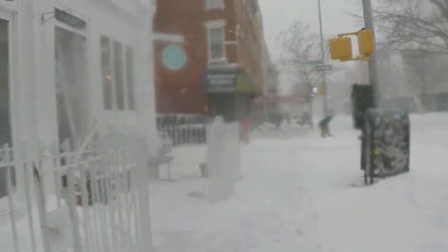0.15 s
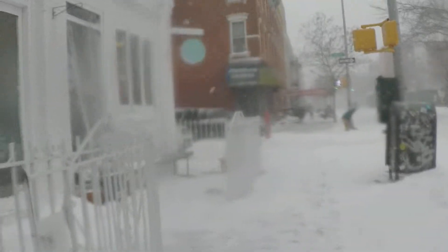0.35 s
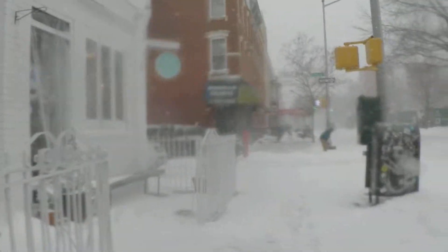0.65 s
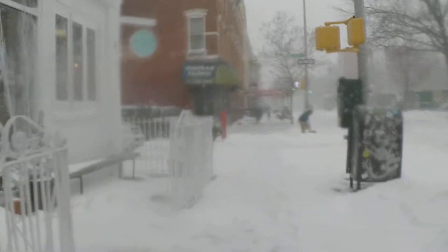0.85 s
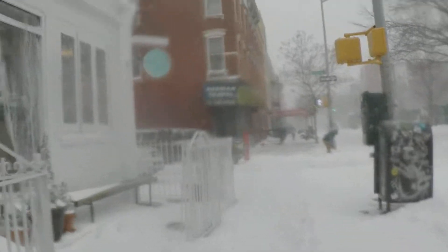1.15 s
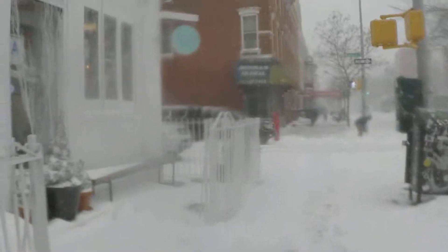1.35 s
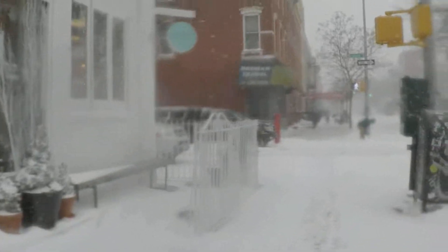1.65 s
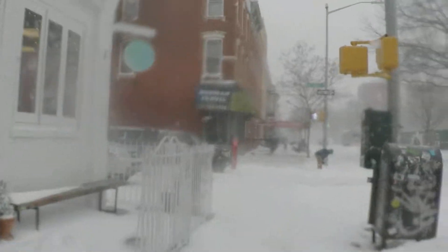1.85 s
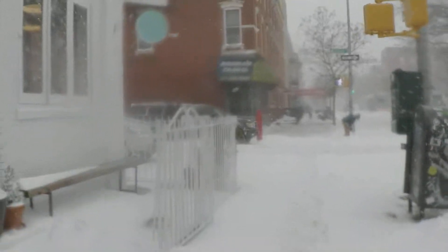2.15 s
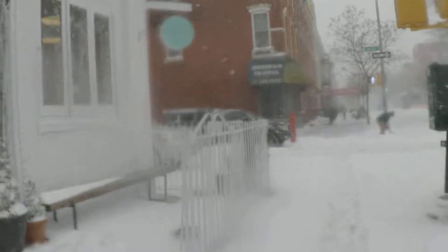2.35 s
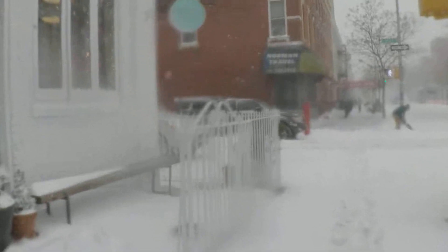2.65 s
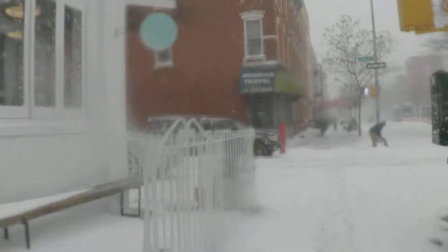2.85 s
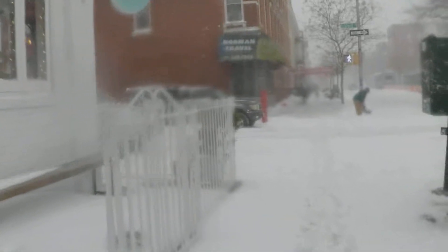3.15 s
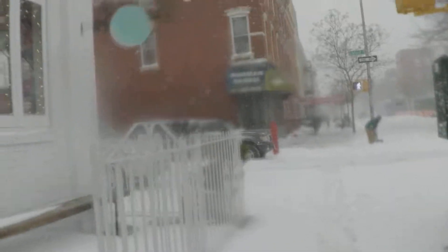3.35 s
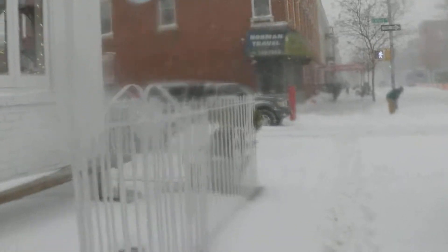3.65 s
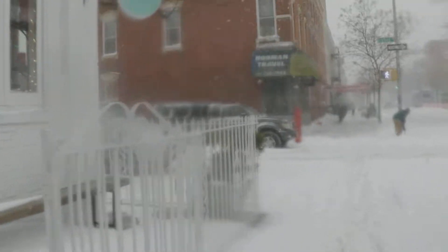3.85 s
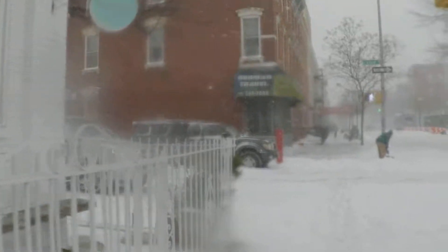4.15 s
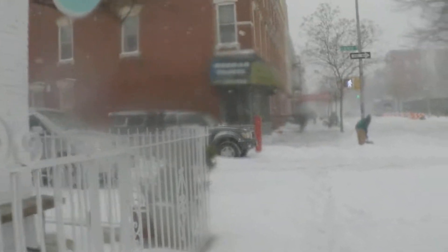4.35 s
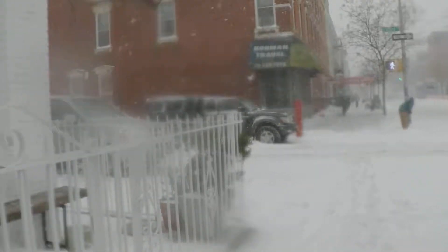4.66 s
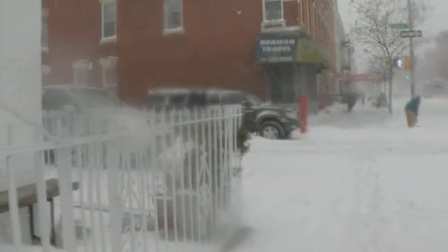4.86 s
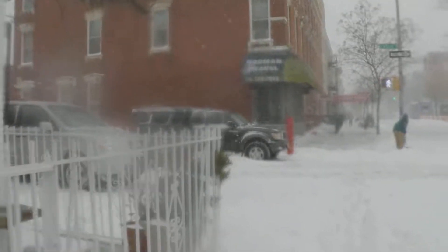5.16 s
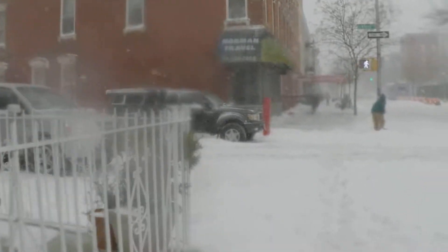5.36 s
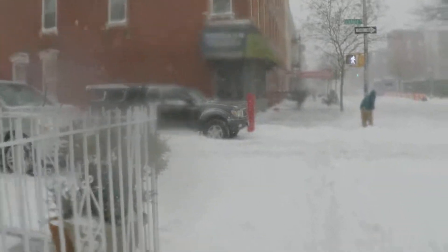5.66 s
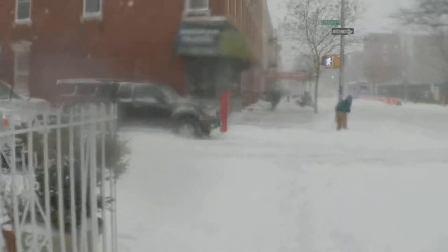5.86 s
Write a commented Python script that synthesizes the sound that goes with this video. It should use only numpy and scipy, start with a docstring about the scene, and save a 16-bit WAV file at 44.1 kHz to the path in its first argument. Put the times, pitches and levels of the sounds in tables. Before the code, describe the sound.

Blizzard gusts roar and thump across a hand-held microphone while ice grains patter sharply and boots softly crunch through packed snow.

```python
"""Wind rumbles and roars over the two ports of a hand-held phone, on a snowed-in street in a blizzard.
Filtered noise follows the gusts; each port has its own eddies, and blasts fall mostly on the right one.
Close on the case, random impulses make the patter of snow, and short ringing bursts the grains and knocks.
Drifting snow rustles along the ground, and now and then the airflow rasps at the edge of the case.
Underfoot and faint below the wind, steps crunch as dense small fractures with cracks and squeaks."""
import sys
import numpy as np
from scipy import signal
from scipy.fft import rfft, irfft
from scipy.io import wavfile
from scipy.ndimage import uniform_filter1d, minimum_filter1d

SR = 44100
rng = np.random.default_rng(int(sys.argv[2]) if len(sys.argv) > 2 else 0)


def log_audio(samples):
    """Write samples as a 16-bit WAV file to the path given in sys.argv[1]."""
    # one column per channel
    frames = np.atleast_2d(samples).T
    # limit to full scale, then quantise
    limited = np.clip(frames, -1, 1)
    pcm = np.round(limited * 32767).astype(np.int16)
    wavfile.write(sys.argv[1], SR, pcm)


N = 264644
TIME = np.arange(N) / SR  # s
FREQ = np.fft.rfftfreq(N, 1 / SR)  # Hz

# Levels are relative: each source sets its own gain. A spread is the standard deviation of a bell.
# Slow pressure of the gusts on the whole phone. Each row: time in seconds, level in dB.
RUMBLE = [(0, -18), (.22, -18.5), (.32, -17.5), (.8, -17), (.95, -18.5), (1.25, -14), (1.4, -17.5),
          (1.7, -18), (2.0, -20), (2.25, -18), (2.6, -16.5), (3.1, -16.5), (3.42, -19.5), (3.85, -17),
          (4.0, -19), (4.3, -16), (4.5, -17), (4.75, -19.5), (5.15, -18), (5.35, -17.5), (5.5, -17.5),
          (5.8, -16), (6.0, -20)]
# Random dips in the rumble noise, placed by hand. Each row: centre in seconds,
# depth in dB (negative for a slight rise), spread in seconds.
DIPS = [(0.084, 8, 0.014), (0.202, 4, 0.015), (.56, 9.5, 0.012), (1.358, 3, 0.018), (1.952, 1, 0.011),
        (3.342, 3.5, 0.012), (3.45, 2.5, 0.017), (4.202, 5.5, .014), (4.643, 5, 0.0098),
        (5.036, 2.5, 0.023), (5.218, -0.5, .014), (5.484, 3, 0.022)]
# Deep surges of pressure. Each row: centre in seconds, level in dB, spread in seconds.
SURGES = [(.5, -14.5, 0.012), (.62, -15, 0.0068), (.73, -19, 0.043), (1.11, -15, 0.016), (1.79, -16, 0.023),
          (3.76, -21, 0.02), (4.08, -14.5, 0.016), (5.63, -19, 0.064), (5.9, -14.5, 0.058)]
# Spectrum of the rumble. Each row: frequency in Hz, gain in dB.
RUMBLE_COLOUR = [(8, -4), (20, -3), (35, 0.5), (55, 0), (85, -4.5), (130, -11.5), (200, -17.5), (300, -26),
                 (450, -39), (900, -99)]
# Air rushing round the case. Each row: time in seconds, level in dB.
ROAR = [(0, -25.5), (.2, -27), (.74, -24), (.95, -25.5), (1.28, -24.5), (1.42, -30), (2.1, -28),
        (2.7, -23.5), (3.25, -23.5), (3.65, -21), (3.93, -18.5), (4.22, -23.5), (4.45, -22.5),
        (4.62, -23.5), (4.85, -20.5), (5.05, -20), (5.35, -21), (5.75, -24), (6.0, -22)]
# Spectrum of the roar. Each row: frequency in Hz, gain in dB.
ROAR_COLOUR = [(80, -11), (180, -1), (260, 3.5), (330, -1.5), (450, 1), (600, -3.5), (700, -14.5),
               (820, -22.5), (1000, -24.5), (1400, -54), (3000, -82.5)]
# Spectrum of the brighter rush. Each row: frequency in Hz, gain in dB.
RUSH_COLOUR = [(250, -27.5), (550, 13.5), (780, 6), (1000, -5), (1400, -14), (1900, -24), (2500, -31.5),
               (5000, -38.5), (12000, -62.5)]
# Gusts that sound hollow. Each row: centre in seconds, level in dB, spread in seconds,
# level of their bright rush in dB, pitch in Hz.
HOLLOW_GUSTS = [(3.8, -19, .029, -40, 444), (3.928, -18, .063, -61, 443), (3.89, -27, .04, -60, 550),
                (4.003, -22, .033, -42, 525), (4.08, -27, .016, -33, 600), (4.707, -28, .009, -29, 560),
                (4.811, -21.5, .011, -26, 607), (4.932, -16, .019, -26, 497), (4.935, -27, .014, -50, 780),
                (5.4, -23, .019, -55, 463)]
# Left port against the right for the shared wind. Each row: frequency in Hz, gain in dB, lead in radians.
LEFT_SIDE = [(40, -5.5, 0.079), (120, -5, 0.66), (233, -9.5, 0.19), (423, -7.5, 0.14), (647, -5, 0.19),
             (893, -4, 0.27), (1320, -4.5, 1.21), (3080, 0.5, 2.68)]
# Spells of eddies breaking on the ports. Each row: start in seconds, length in seconds, level in dB.
EDDIES = [(0.64, 0.056, -20), (1.388, 0.22, -20), (1.635, 0.097, -22.5), (1.704, 0.032, -26),
          (2.315, 0.15, -21.5), (2.449, 0.13, -22), (2.668, 0.24, -22.5), (4.03, 0.16, -32),
          (4.215, 0.21, -28), (5.324, 0.082, -21)]
# Spectrum of the eddies. Each row: frequency in Hz, gain in dB.
EDDY_COLOUR = [(30, -20), (100, 14.5), (200, 9), (330, 2.5), (480, -4), (650, -19.5), (850, -46),
               (1200, -43), (2000, -42.5), (5000, -80)]
# Sudden blasts, mostly into the right port. Each row: centre in seconds, level in dB, spread in seconds.
BLASTS = [(.72, -19, .035), (1.307, -5, .018), (1.5, -21, .04), (1.67, -18, .02), (2.385, -26, .022),
          (3.82, -19, .025), (3.93, -19, .04), (4.068, -15.5, .016), (4.145, -8, .019), (5.67, -16.5, .035),
          (5.945, -16.5, .045)]
# Spectrum of a blast. Each row: frequency in Hz, gain in dB.
BLAST_COLOUR = [(40, -20), (100, -4), (175, 6), (300, -1), (480, -10), (700, -24), (950, -40), (1400, -52),
                (3000, -72)]
# Level of the blown snow, with dips where the recorder's limiter ducks after blasts.
# Each row: time in seconds, level in dB.
SNOW_LEVEL = [(0, -59), (.3, -55), (.5, -55), (.73, -52), (.92, -58.5), (1.2, -53.5), (1.28, -56.5),
              (1.335, -63.5), (1.4, -57.5), (1.6, -58.5), (1.9, -56.5), (2.25, -56.5), (2.5, -56.5),
              (2.88, -56), (3.1, -57.5), (3.65, -57.5), (4.0, -52.5), (4.2, -58.5), (4.6, -59),
              (5.2, -54.5), (5.52, -57), (5.67, -61.5), (5.9, -57.5)]
# Each port's own ring when snow hits it. Each row: frequency in Hz, left gain in dB, right gain in dB.
PORT_COLOUR = [(507, -3.5, 10), (1420, 5, 6.5), (3140, -3.5, 0), (5040, -6, -4), (6100, -0.5, -0.5),
               (7700, 2, 4.5), (8250, -10, 2.5), (10020, -7.5, 3), (11200, -17, -5.5), (13100, -20, -16),
               (15900, -32, -36)]
# The largest ice grains, close to a port. Each row: start in seconds, mean peak of the two ports in dB,
# ringing pitch in Hz, left minus right in dB.
GRAINS = [(.162, -36, 8060, -7), (.2254, -32, 7100, -5), (.2423, -39, 7600, -7), (.2748, -30.5, 7400, -6),
          (0.312, -31, 8500, -10), (.322, -38, 6500, -5), (.4564, -34, 7400, -3), (.4738, -37, 7400, -3),
          (0.6465, -30, 7060, -3), (.651, -33, 8000, -7), (0.697, -32, 7400, 5), (.727, -30, 7300, -3),
          (0.755, -39, 7000, -2), (.761, -35, 6600, -3), (.769, -33, 8500, -6), (.8714, -36, 7400, 1),
          (.9004, -34.5, 8950, -8), (1.062, -32, 8600, -11), (1.117, -30.5, 6800, -4),
          (1.13, -33, 7500, -4), (1.173, -37, 7800, -1), (1.1816, -26, 7600, 1), (1.1907, -25.5, 7200, -4),
          (1.282, -33.5, 7000, -1), (1.367, -39, 6950, -2), (1.5783, -28, 7600, -1),
          (1.6137, -33.5, 7950, -11), (1.626, -36, 6300, -7), (1.7504, -37.5, 7700, -14),
          (1.797, -31, 8650, -10), (1.8427, -33.5, 7400, -8), (1.9086, -34, 7300, -3),
          (1.9856, -31.5, 7400, -4), (2.0113, -31, 8950, -6), (2.0423, -33, 7600, -3),
          (2.1944, -38.5, 7060, -8), (2.333, -33, 7200, 1), (2.4289, -34, 7250, -2),
          (2.5531, -39, 8200, -12), (2.818, -32, 7500, -3), (2.834, -30, 7500, -5),
          (3.2365, -20.5, 7500, -10), (3.3468, -34.5, 8300, -11), (3.5319, -25.5, 8700, 1),
          (3.8038, -40, 8000, -5), (3.9933, -28, 8000, -2), (4.0442, -30, 7400, -2), (4.068, -38, 7000, -3),
          (4.161, -44, 9500, -5), (4.2423, -38, 8700, -10), (4.334, -33, 7400, -3), (4.4498, -42, 7100, 1),
          (4.594, -33, 7140, -5), (4.6149, -37, 6300, -4), (5.0484, -34, 7000, 0),
          (5.0634, -32.5, 7800, -5), (5.134, -35, 7200, 0), (5.1432, -35, 7200, 6), (5.188, -29, 7160, -2),
          (5.2235, -37, 7500, -9), (5.2794, -27.5, 7350, 1), (5.3587, -37, 6500, -1),
          (5.8137, -40.5, 7700, -12)]
# Small knocks on the case. Each row: start in seconds, level in dB, ringing pitch in Hz.
KNOCKS = [(0.3656, -35, 1500), (0.8714, -24.5, 1480), (1.307, -42, 2600), (1.476, -45, 1350),
          (1.6252, -41, 1400), (3.237, -41, 1750)]
# Spectrum of a knock before it is shifted to its pitch. Each row: frequency in Hz, gain in dB.
KNOCK_COLOUR = [(500, -28), (1000, -4), (1450, 7), (2100, -4), (3200, -10), (5000, -26), (12000, -29)]
# Sheets of drifting snow. Each row: centre in seconds, level in dB, spread in seconds.
DRIFTS = [(.49, -55.5, 0.12), (4.44, -59, .04), (5.03, -59, 0.088), (5.22, -59, 0.064), (5.42, -53, 0.024),
          (5.52, -60, 0.026)]
# Spectrum of drifting snow. Each row: frequency in Hz, gain in dB.
DRIFT_COLOUR = [(700, -12), (1400, 1.5), (2100, -1), (3000, -7.5), (5000, -15.5), (10000, -40)]
# Rasping bursts of torn airflow. Each row: centre in seconds, level in dB, spread in seconds.
FLAPS = [(.68, -32, .025), (1.303, -25, .014), (1.475, -18.5, .016), (1.55, -19, .024),
         (1.666, -17.5, .018), (2.383, -21.5, .024), (2.52, -25.5, .045), (2.895, -27, .016),
         (5.39, -27, .02)]
# Spectrum of torn airflow. Each row: frequency in Hz, gain in dB.
FLAP_COLOUR = [(120, -12), (300, -1), (450, 0), (600, -3), (750, -10.5), (950, -15), (1200, -23),
               (1600, -40), (3000, -56), (6000, -80)]
# Footsteps. Each row: start in seconds, length in seconds, level in dB,
# share of bright scuffing in dB, rise from first touch to full weight in dB.
STEPS = [(1.175, 0.082, -48, 0, 7), (2.338, 0.39, -44.5, -10, 9), (3.703, 0.48, -45, -3.5, 9.5),
         (4.715, 0.36, -53.5, -14, 2), (5.475, 0.13, -64.5, 14.5, 5)]
# The crust gives way under a boot. Each row: start in seconds, level in dB, decay in seconds,
# share of bright snap in dB, squeak pitch in Hz, squeak level in dB.
CRUNCHES = [(1.2057, -47, .017, -14, 1550, -42), (2.4452, -48, .01, -12, 1900, -47),
            (2.5161, -39, .01, -5, 1900, -46), (2.5934, -43, .01, -10, 1800, -48),
            (2.626, -45, .01, -14, 1750, -43), (2.6368, -35, .011, -12, 1850, -41),
            (2.7316, -39, .011, -14, 1750, -41), (3.6953, -36, .016, -12, 1250, -41),
            (3.7436, -44, .014, -3, 1800, -48), (3.7796, -42, .02, -3, 3050, -46),
            (3.8205, -38.5, .016, 5, 3100, -49), (3.8968, -43, .014, 3, 1850, -46),
            (3.9372, -43, .016, 3, 1750, -45), (3.9901, -42, .016, 3, 980, -38),
            (4.025, -44, .01, -3, 1900, -44), (4.0739, -45, .01, -4, 2000, -48),
            (4.7003, -39.5, .022, -6, 1250, -45), (4.7906, -35.5, .008, -6, 3050, -47),
            (4.806, -34, .02, -13, 1800, -45), (4.812, -46, .014, -4, 4150, -46),
            (4.836, -46, .02, -6, 1800, -49), (4.9258, -51, .014, -10, 2000, -52)]
# Spectrum of snow pressed by a boot. Each row: frequency in Hz, gain in dB.
STEP_COLOUR = [(300, 18), (700, 5.5), (1150, -33), (1255, 2), (1450, -7), (1800, 4), (1950, -2),
               (2075, 0.5), (2260, -16), (2490, -3.5), (2750, -15.5), (4000, -11), (8000, -74)]
# Spectrum of the bright scuffing. Each row: frequency in Hz, gain in dB.
SCUFF_COLOUR = [(1500, 16), (2750, 0.5), (3020, 10), (3300, 8), (3650, -3), (4100, 6), (4800, -4.5),
                (5600, 5.5), (6300, 1), (7400, 6), (8500, -14), (13000, -53)]


def undb(db):
    """Decibels to gain."""
    return 10 ** (np.asarray(db) / 20)


def unit(x):
    """Scale to rms 1."""
    return x / np.sqrt(np.mean(x ** 2))


def curve(table):
    """Level column of a time table at every sample."""
    seconds, level = np.transpose(table)
    return np.interp(TIME, seconds, level)


def bell(centre_s, spread_s):
    """Bell-shaped rise and fall of peak 1."""
    return np.exp(-.5 * ((TIME - centre_s) / spread_s) ** 2)


def swells(table, axis=1):
    """Sum of bell-shaped swells as a gain at every sample; axis picks the level column."""
    return sum(undb(row[axis]) * bell(row[0], row[2]) for row in table)


def response(table, axis=1):
    """One column of a frequency table at every frequency."""
    rows = np.transpose(table)
    return np.interp(np.log(FREQ + 1), np.log(rows[0]), rows[axis])


def colour(x, table, axis=1):
    """Causal (minimum-phase) filter with the given spectrum, so that clicks ring after they strike."""
    cepstrum = irfft(np.log(undb(response(table, axis))), N)
    cepstrum[1:N // 2] *= 2
    cepstrum[N // 2 + 1:] = 0
    return irfft(rfft(x) * np.exp(rfft(cepstrum)), N)


def smooth(x, seconds):
    """Triangular running mean."""
    size = max(int(seconds * SR), 1)
    return uniform_filter1d(uniform_filter1d(x, size), size)


def walk(rate):
    """Random drift of spread 1 that changes about rate times a second."""
    return unit(smooth(rng.standard_normal(N), 1 / rate))


def steady(x, span_s):
    """Even out the strength of a noise over spans longer than span_s."""
    return x / np.sqrt(smooth(x ** 2, span_s) + 1e-18)


def turbulence(table, steady_s):
    """Coloured pressure noise of even strength over spans longer than steady_s."""
    return steady(colour(rng.standard_normal(N), table), steady_s)


def impacts(per_second, spread_db):
    """Tiny impacts at random moments, their sizes spread in dB and capped at the top."""
    hit = rng.random(N) < per_second / SR
    size = np.minimum(rng.standard_normal(N), 2.7)
    return hit * np.sign(rng.standard_normal(N)) * undb(spread_db * size)


def tap(start_s, decay_s, rattle):
    """A sharp contact followed by a brief rattle."""
    age = TIME[:N // 20]
    push = rattle * rng.standard_normal(len(age)) * np.exp(-age / decay_s)
    push[0] = 1
    return np.concatenate([np.zeros(int(start_s * SR)), push, np.zeros(N)])[:N]


def dips():
    """Level change of the rumble in its random dips, in dB at every sample, positive downwards."""
    return sum(depth_db * bell(s, spread_s) for s, depth_db, spread_s in DIPS)


def hollow_gusts(width_hz=53.0, skirt_db=-33.0):
    """Each hollow gust rings a broad resonance of its own pitch, over a faint wider skirt."""
    out, air = 0, rfft(rng.standard_normal(N))
    for row in HOLLOW_GUSTS:
        offset_hz = FREQ - row[4]
        core = 1 / (1 + (offset_hz / (width_hz / 2)) ** 4)
        skirt = 1 / (1 + (offset_hz / (2 * width_hz)) ** 4)
        ring = irfft(air * (core + undb(skirt_db) * skirt), N)
        out = out + swells([row]) * steady(ring, 0.059)
    return out


def wind(rumble_db=5.5, roar_db=0.5, rush_db=-9.5, surge_db=1.15, null_hz=369, null_width=0.56):
    """Rumble, roar and rush reach both ports: in step in the bass, opposed above a null on the left."""
    gusts = undb(curve(RUMBLE) - dips() + surge_db * walk(31.0))
    pressure = np.hypot(gusts, swells(SURGES))
    rumble = turbulence(RUMBLE_COLOUR, steady_s=0.022) * pressure * undb(rumble_db)
    roar = turbulence(ROAR_COLOUR, steady_s=0.041) * undb(curve(ROAR) + roar_db)
    # the brighter rush follows the roar and the hollow gusts
    fast_air = undb(curve(ROAR) + rush_db) + swells(HOLLOW_GUSTS, axis=3)
    rush = turbulence(RUSH_COLOUR, steady_s=0.023) * fast_air
    right = rumble + roar + rush + hollow_gusts()
    polarity = np.tanh(np.log(null_hz / (FREQ + 1)) / null_width)
    lean = polarity * undb(response(LEFT_SIDE)) * np.exp(1j * response(LEFT_SIDE, axis=2))
    return np.array([irfft(rfft(right) * lean, N), right])


def spell(start_s, length_s, attack_s=0.019, release_s=0.035):
    """Attack, hold and release of a spell of eddies."""
    attack = np.clip((TIME - start_s) / attack_s, 0, 1)
    return attack * np.exp(-np.maximum(TIME - start_s - length_s, 0) / release_s)


def eddies(left_db=2.0, right_db=0.0, flutter_db=2.0, calm_db=-27.0, tearing_db=-17.5):
    """Eddies flutter at each port on its own, weakly in any gust and strongly in spells."""
    spells = np.max([undb(db) * spell(s, length_s) for s, length_s, db in EDDIES], axis=0)
    strength = undb(curve(RUMBLE) + calm_db) + spells
    ports = []
    for db in (left_db, right_db):
        body = strength * turbulence(EDDY_COLOUR, steady_s=0.018)
        # the square makes strong eddies brighter
        tearing = strength ** 2 * undb(tearing_db) * turbulence(RUSH_COLOUR, steady_s=0.021)
        ports.append((body + tearing) * undb(db + flutter_db * walk(91)))
    return np.array(ports)


def blasts(spill_db=-22.5, roar_db=2.0):
    """Blasts thump into the right port and spill to the left; the cube lets only the hardest roar."""
    force = swells(BLASTS)
    thump = force * turbulence(BLAST_COLOUR, steady_s=0.028)
    roar = force ** 3 * undb(roar_db) * turbulence(ROAR_COLOUR, steady_s=0.0052)
    return np.array([undb(spill_db) * thump, thump + roar])


def snow(per_second=2500, flurry_db=2.0, swirl_db=0.4, hiss_db=-1.0, left_db=0.5, right_db=4.5):
    """Fine snow patters on each port in swirls and quick flurries, over the hiss of the air carrying it."""
    flow = undb(curve(SNOW_LEVEL) + flurry_db * walk(74) + swirl_db * walk(4.4))
    ports = []
    for column, db in ((1, left_db), (2, right_db)):
        patter = unit(impacts(per_second, spread_db=2.5))
        hiss = undb(hiss_db) * rng.standard_normal(N)
        ports.append(undb(db) * flow * unit(colour(patter + hiss, PORT_COLOUR, column)))
    return np.array(ports)


def shatter(hz, decay_s=0.00098, octaves=0.26, body_db=-10.5, contact=0.61):
    """One grain breaking up: a sharp contact and a short noise burst, of peak 1, ringing round its pitch."""
    age, band = TIME[:512], np.fft.rfftfreq(512, 1 / SR)
    focus = np.exp(-.5 * (np.log2((band + 1) / hz) / octaves) ** 2)
    body = undb(body_db) / (1 + (band / (1.4 * hz)) ** 8)
    push = rng.standard_normal(len(age)) * np.exp(-age / decay_s)
    push[0] += 2 * contact
    # the filter is symmetric in time: 24 samples leave room for its lead
    burst = irfft(rfft(np.roll(push, 24)) * (focus + body))
    return burst / np.abs(burst).max()


def ice_grains(count=560, small_db=9.5, scatter_db=4.0, pitch_octaves=.17):
    """Large grains strike the case; small ones fall at random, more often and harder where snow is loud."""
    level_db = curve(SNOW_LEVEL)
    fallen = np.cumsum(undb(level_db))
    landings = np.searchsorted(fallen / fallen[-1], rng.random(count))
    chances = np.minimum(rng.standard_normal((count, 3)), 1.7)
    grains = list(GRAINS)
    for i, (size, pitch, lean) in zip(landings, chances):
        db = level_db[i] + small_db + scatter_db * size
        grains.append((TIME[i], db, 7900 * 2 ** (pitch_octaves * pitch), 3 * lean - 4.5))
    out = np.zeros((2, N + SR))
    for s, db, hz, pan_db in grains:
        start = int(s * SR)
        for side, sign in enumerate((1, -1)):  # opposite polarity at the two ports
            burst = shatter(hz)
            out[side, start:start + len(burst)] += sign * undb(db + sign * pan_db / 2) * burst
    return out[:, :N]


def knocks(knock_db=8.5, decay_s=0.0016, rattle=0.6):
    """Dull little knocks on the case, each of its own pitch, with a separate rattle at each port."""
    out = np.zeros((2, N))
    main_hz = max(KNOCK_COLOUR, key=lambda point: point[1])[0]
    for s, db, hz in KNOCKS:
        ring = [(f * hz / main_hz, gain_db) for f, gain_db in KNOCK_COLOUR]
        ports = np.array([colour(tap(s, decay_s, rattle), ring) for _ in range(2)])
        out = out + undb(db + knock_db) * ports
    return out


def spindrift(left_db=-3.0, right_db=0.0, flicker_db=4.0):
    """Sheets of loose snow rustle along the ground as dense tiny impacts."""
    flow = swells(DRIFTS) * undb(flicker_db * walk(40))
    ports = []
    for db in (left_db, right_db):
        rustle = unit(colour(impacts(5000, spread_db=1.5), DRIFT_COLOUR))
        ports.append(flow * undb(db) * rustle)
    return np.array(ports)


def flaps(right_db=-3.0, opposed=0.85):
    """Airflow tears off the case edge in rasping bursts, louder at the left port, partly opposed right."""
    left, own = (turbulence(FLAP_COLOUR, steady_s=0.042) for _ in range(2))
    right = np.sqrt(1 - opposed ** 2) * own - opposed * left
    return swells(FLAPS) * np.array([left, undb(right_db) * right])


def footsteps(press_db=7.5, scuff_db=-4.0, apart_db=-7.0, jerk_db=1.6, fade_s=0.025, peak_share=0.48):
    """Weight rolls on and off a boot; snow packs in small fractures, with a burst at each crust break."""
    press, scuff = 0, 0
    jerks = jerk_db * walk(74)  # the snow yields unevenly
    for start_s, length_s, db, bright_db, rise_db in STEPS:
        progress = (TIME - start_s) / length_s
        contact = smooth(1. * (progress > 0) * (progress < 1), fade_s)
        roll = np.interp(progress, [0, peak_share, 1], [-1, 0, 1])  # 0 at full weight
        weight = contact * undb(db - rise_db * roll ** 2 + jerks)
        press = press + weight * undb(press_db)
        scuff = scuff + weight * undb(bright_db + scuff_db)
    for s, db, decay_s, snap_db, _, _ in CRUNCHES:
        burst = undb(db) * (TIME > s) * np.exp(-abs(TIME - s) / decay_s)
        press, scuff = press + burst, scuff + undb(snap_db) * burst
    out = 0
    for force, table in ((press, STEP_COLOUR), (scuff, SCUFF_COLOUR)):
        mid, side = (force * unit(colour(impacts(4200, spread_db=8.0), table)) for _ in range(2))
        out = out + mid + undb(apart_db) * side * np.array([[1], [-1]])
    return out


def crust_cracks(crack_db=10, decay_s=.0011, rattle=0.55):
    """Each break of the crust opens with one sharp crack, the same at both ports."""
    taps = sum(undb(db) * tap(s, decay_s, rattle) for s, db, *_ in CRUNCHES)
    return undb(crack_db) * colour(taps, STEP_COLOUR)


def squeak(hz, width_hz=150):
    """Packed snow rubbing on itself: a narrow, unsteady ring of rms 1."""
    size = SR // 4
    band = np.fft.rfftfreq(size, 1 / SR)
    resonance = 1 / (1 + ((band - hz) / width_hz) ** 2)
    return unit(irfft(rfft(rng.standard_normal(size)) * resonance, size))


def crust_squeaks():
    """Each break of the crust squeaks briefly at its own pitch."""
    out = np.zeros((2, N + SR))
    for s, _, decay_s, _, hz, db in CRUNCHES:
        start = int(s * SR)
        for side in range(2):
            ring = squeak(hz)
            fading = ring * np.exp(-TIME[:len(ring)] / decay_s)
            out[side, start:start + len(ring)] += undb(db) * fading
    return out[:, :N]


def scene():
    """Wind on the ports, snow on the case, boots on the ground."""
    air = wind() + eddies() + blasts() + flaps()
    case = snow() + ice_grains() + knocks()
    ground = spindrift() + footsteps() + crust_cracks() + crust_squeaks()
    return air + case + ground


def record(dry, ceiling=.92, release_db_per_s=85.0, ease_s=.004, top_hz=15800):
    """A limiter ducks both ports under peaks and lets go slowly; the ends are eased and the top is cut."""
    over_db = 20 * np.log10(np.maximum(np.abs(dry).max(axis=0) / ceiling, 1))
    recovered = release_db_per_s * TIME
    held_db = minimum_filter1d(-over_db, size=360)  # ducks a little ahead of each peak
    gain_db = np.minimum.accumulate(held_db - recovered) + recovered
    ends = signal.windows.tukey(N, ease_s * SR / N)  # half of ease_s at each end
    top_cut = signal.ellip(8, .2, 70, top_hz, fs=SR, output="sos")
    return signal.sosfilt(top_cut, dry * undb(smooth(gain_db, ease_s)) * ends)


dry = scene()
out = record(dry)
log_audio(out)
```